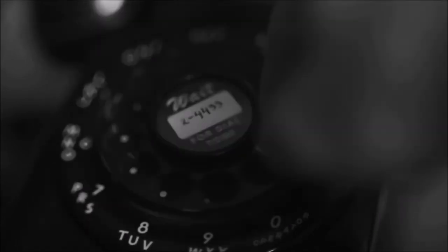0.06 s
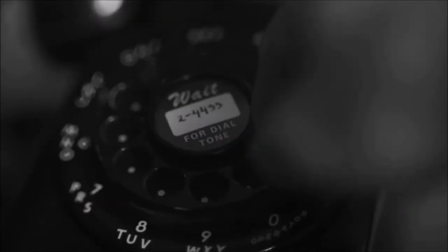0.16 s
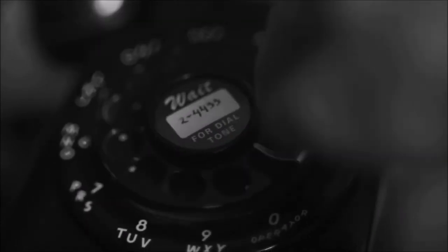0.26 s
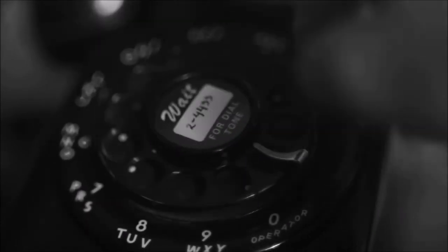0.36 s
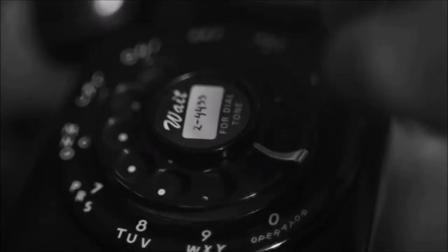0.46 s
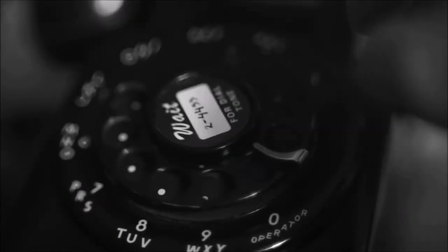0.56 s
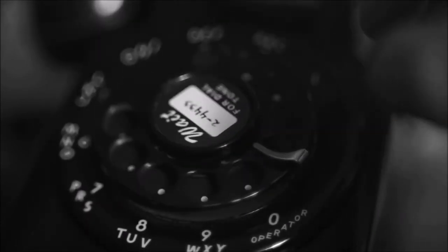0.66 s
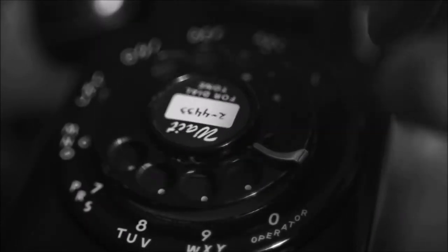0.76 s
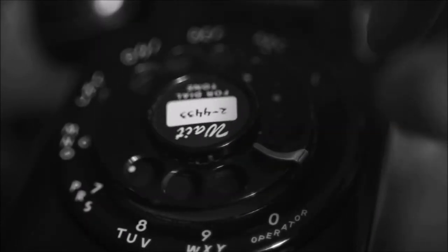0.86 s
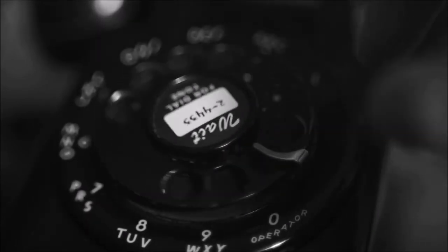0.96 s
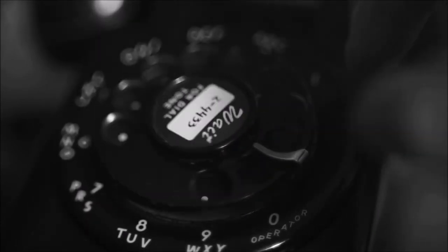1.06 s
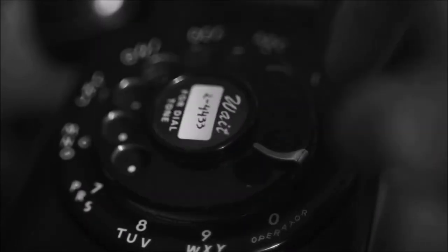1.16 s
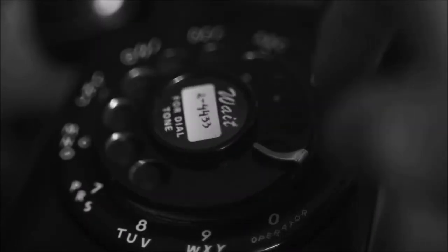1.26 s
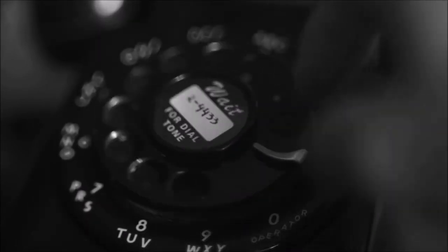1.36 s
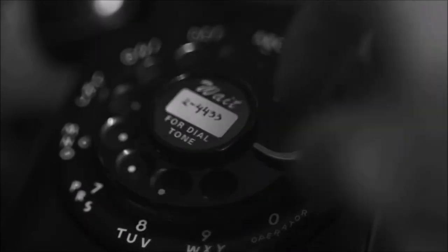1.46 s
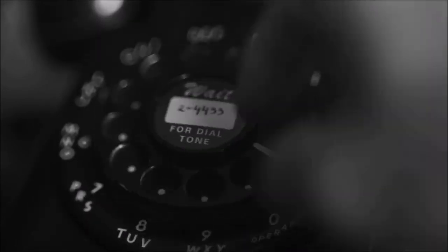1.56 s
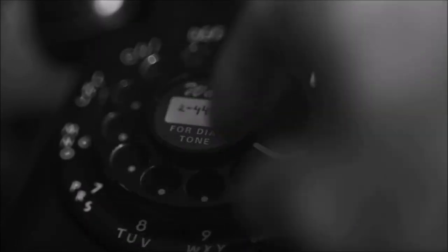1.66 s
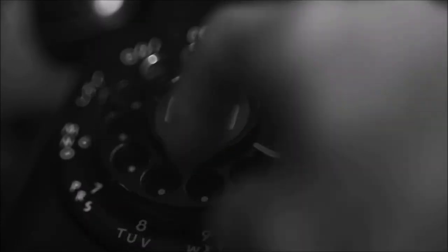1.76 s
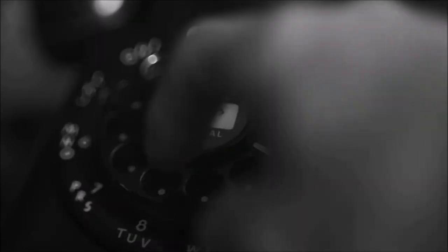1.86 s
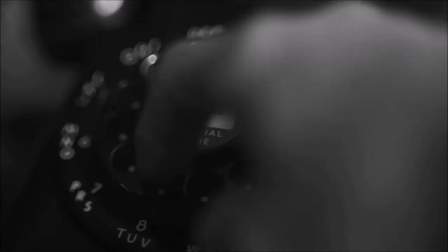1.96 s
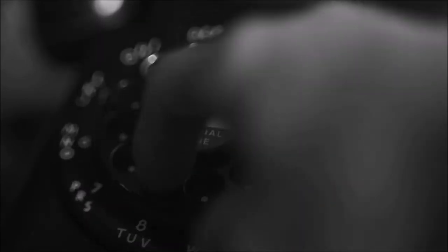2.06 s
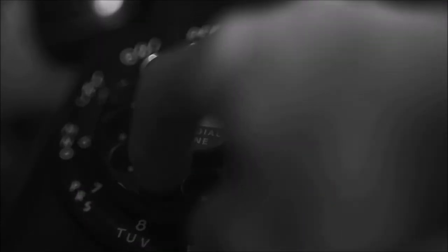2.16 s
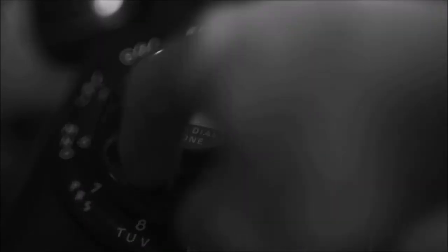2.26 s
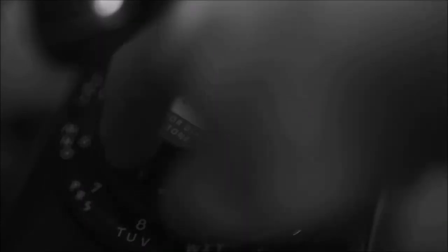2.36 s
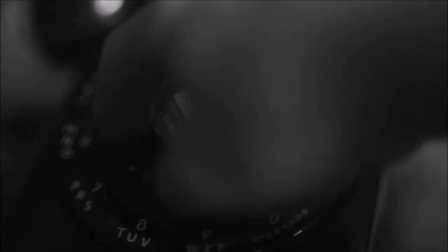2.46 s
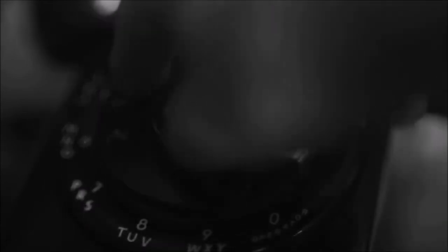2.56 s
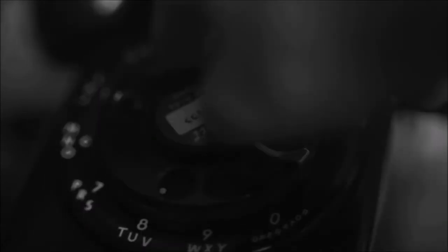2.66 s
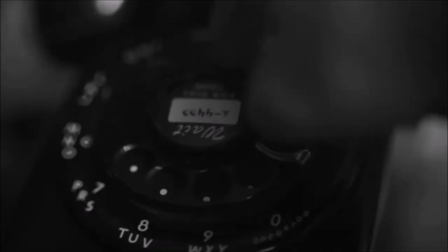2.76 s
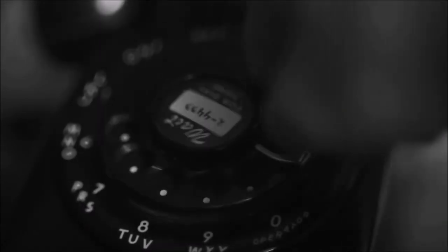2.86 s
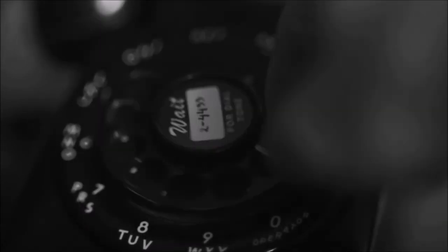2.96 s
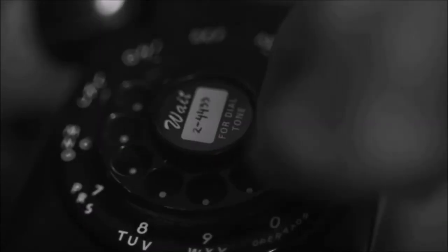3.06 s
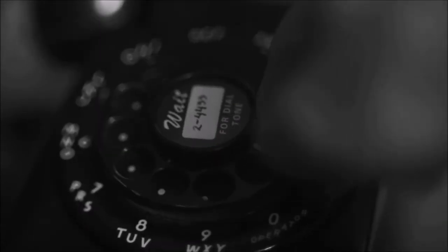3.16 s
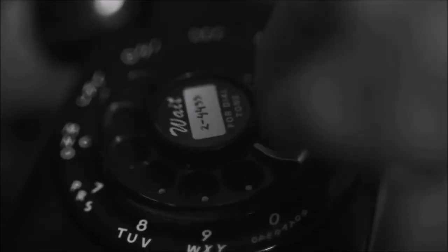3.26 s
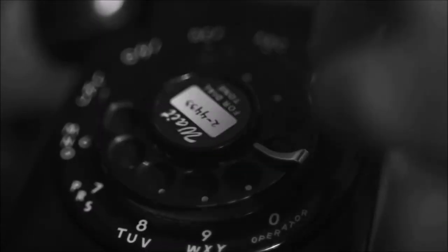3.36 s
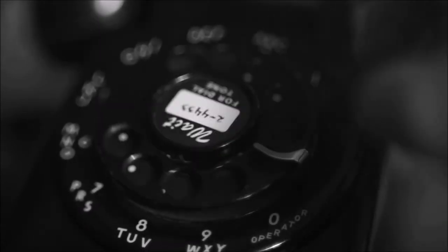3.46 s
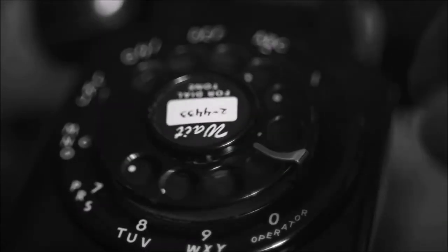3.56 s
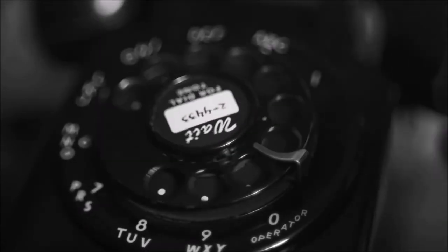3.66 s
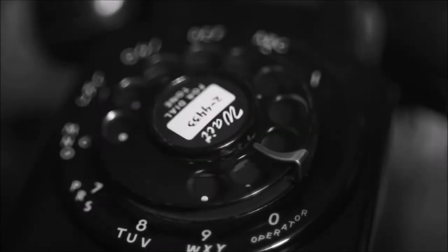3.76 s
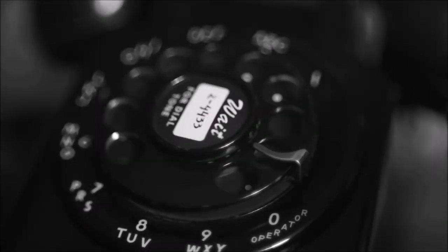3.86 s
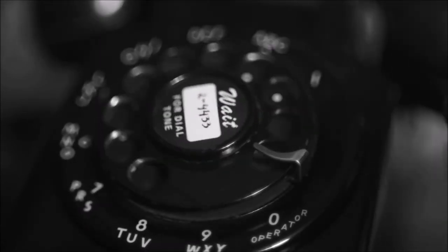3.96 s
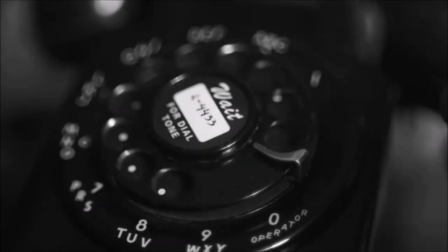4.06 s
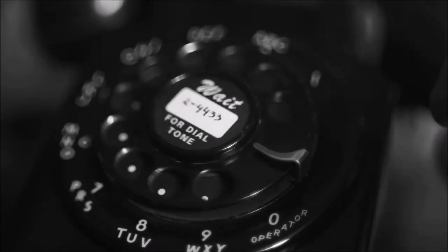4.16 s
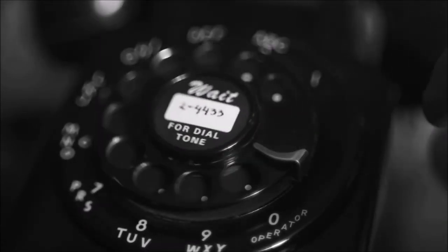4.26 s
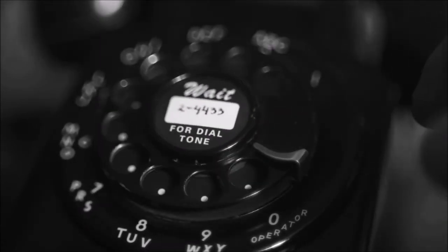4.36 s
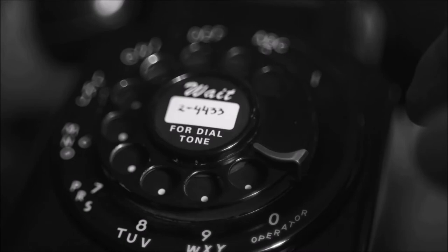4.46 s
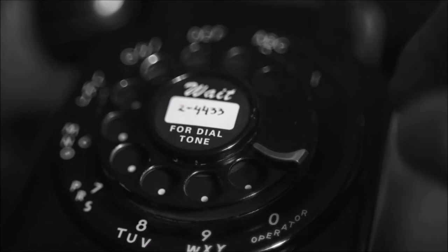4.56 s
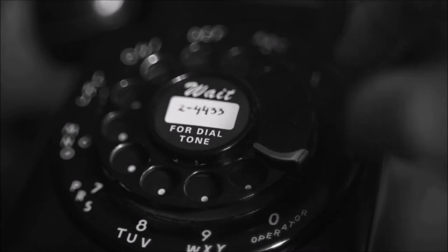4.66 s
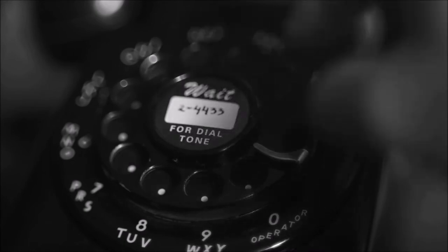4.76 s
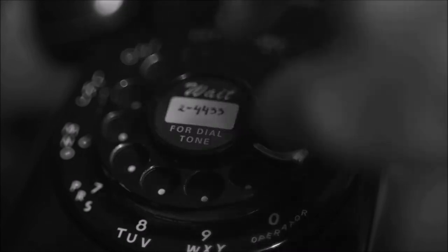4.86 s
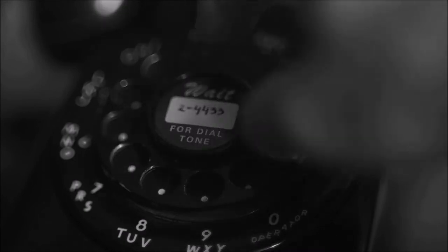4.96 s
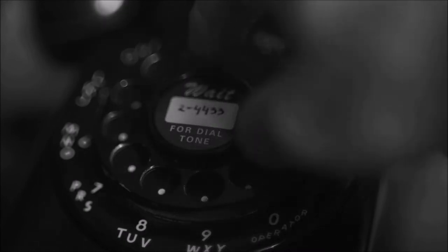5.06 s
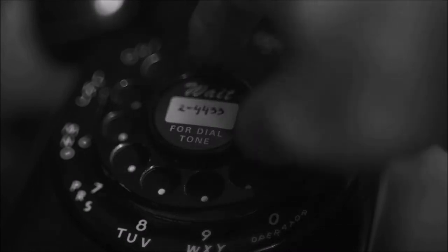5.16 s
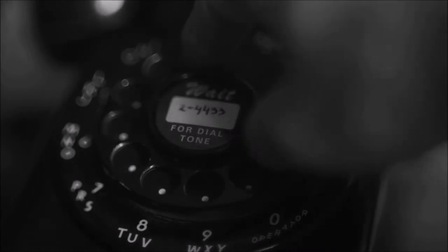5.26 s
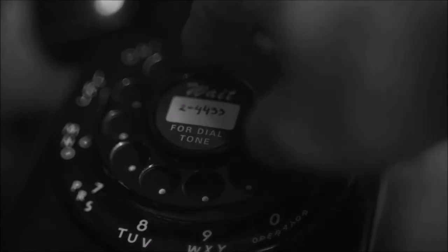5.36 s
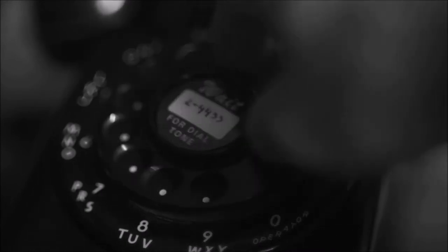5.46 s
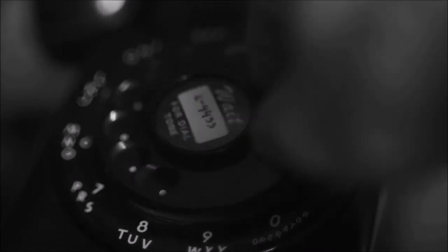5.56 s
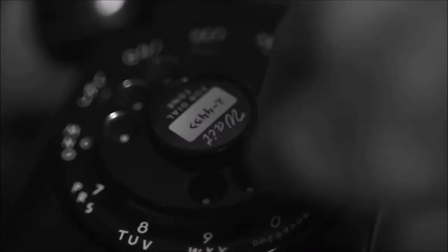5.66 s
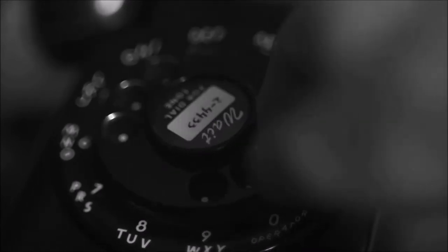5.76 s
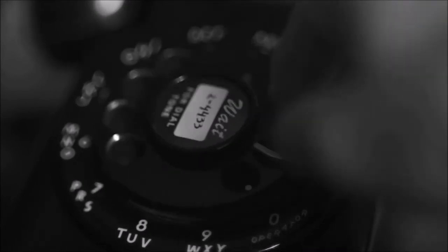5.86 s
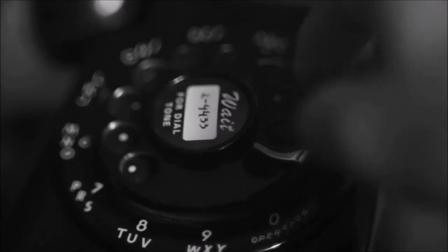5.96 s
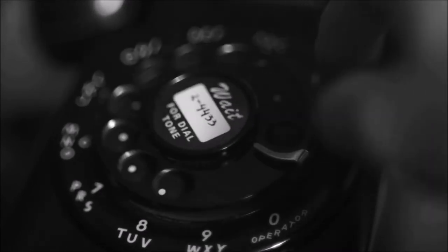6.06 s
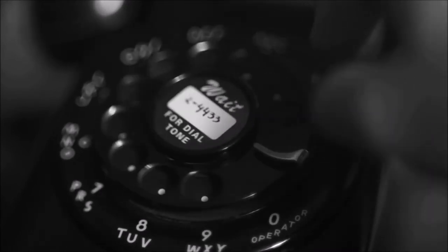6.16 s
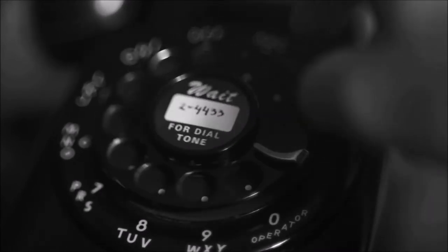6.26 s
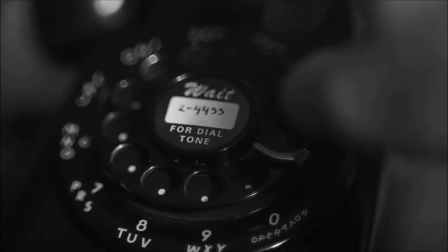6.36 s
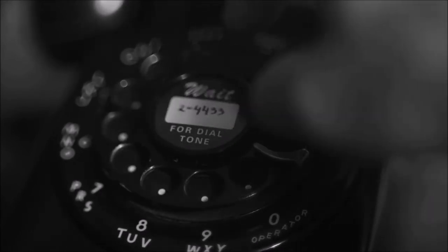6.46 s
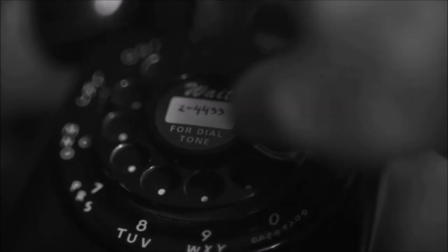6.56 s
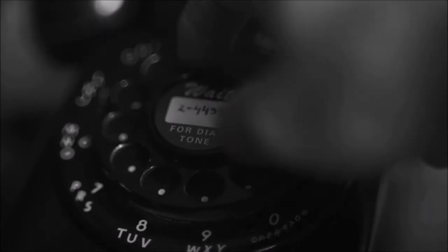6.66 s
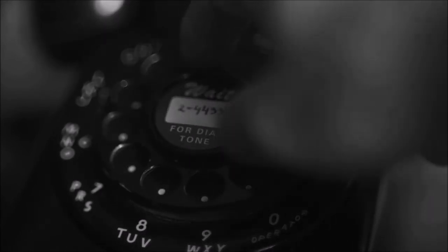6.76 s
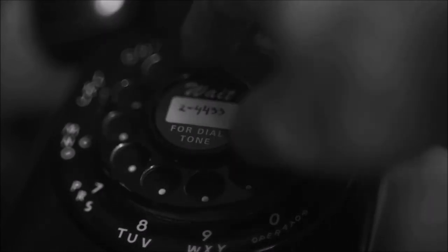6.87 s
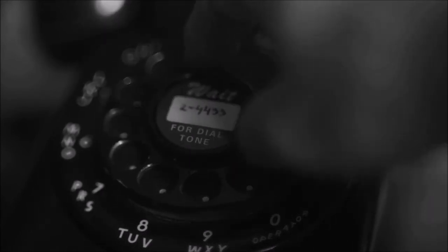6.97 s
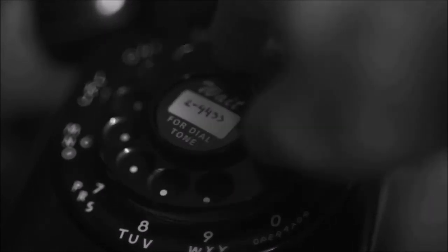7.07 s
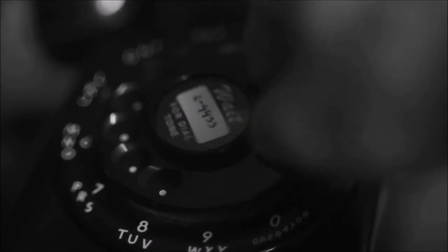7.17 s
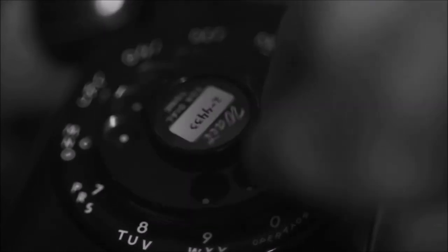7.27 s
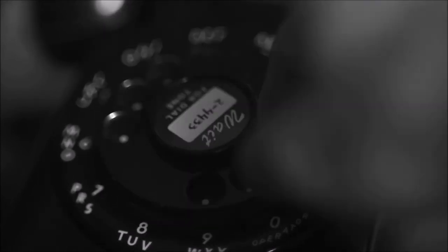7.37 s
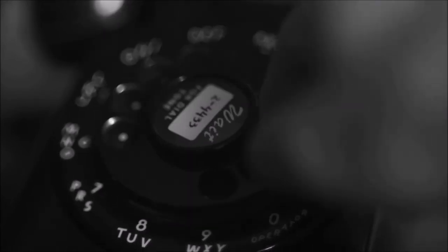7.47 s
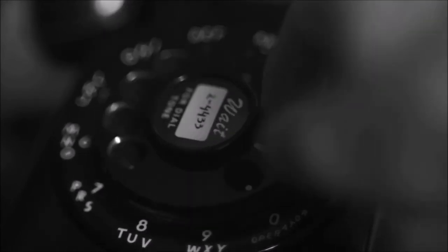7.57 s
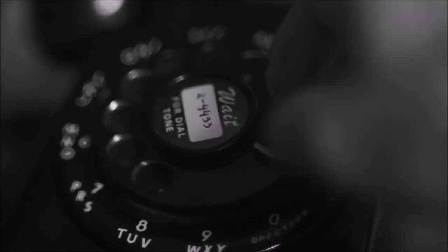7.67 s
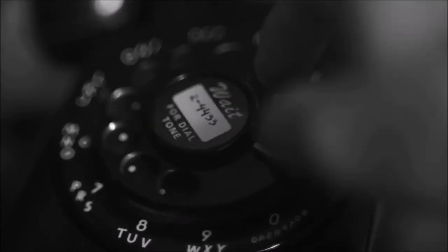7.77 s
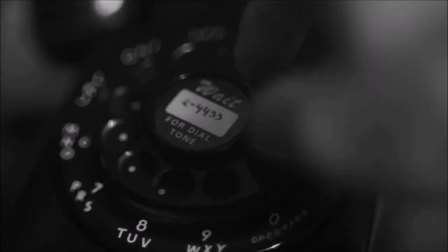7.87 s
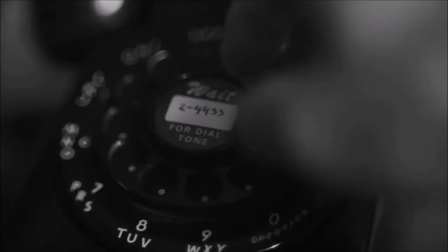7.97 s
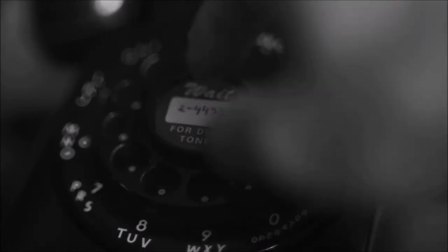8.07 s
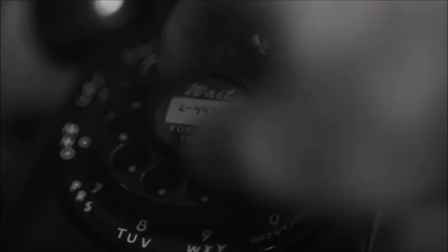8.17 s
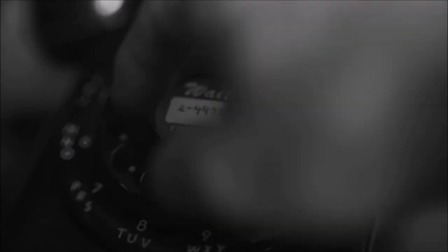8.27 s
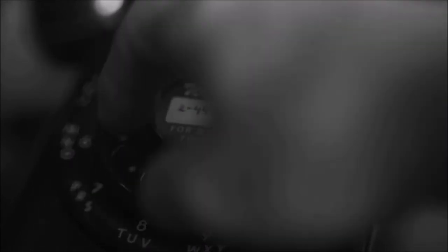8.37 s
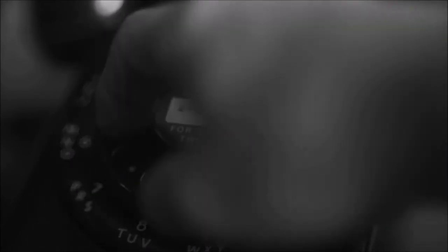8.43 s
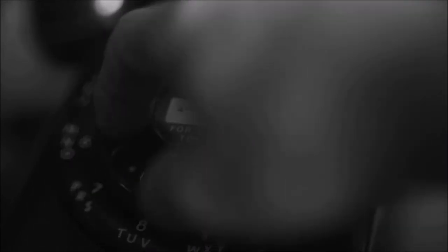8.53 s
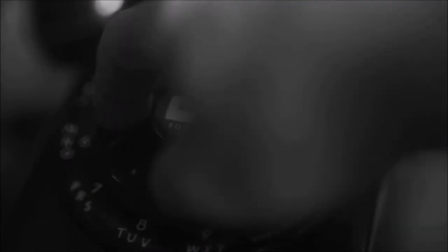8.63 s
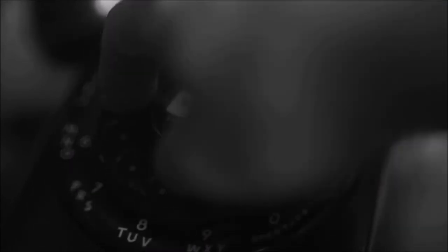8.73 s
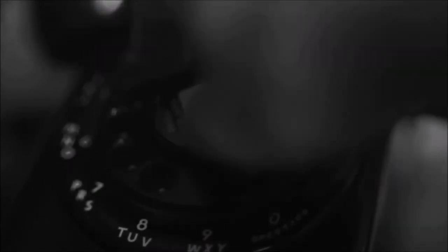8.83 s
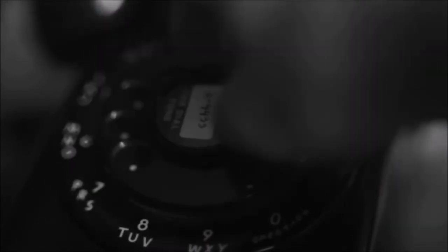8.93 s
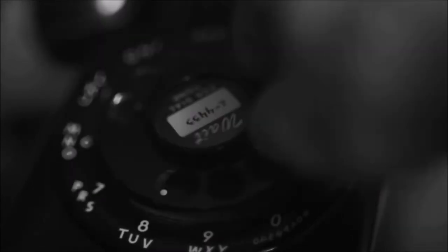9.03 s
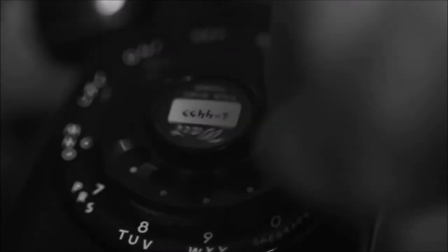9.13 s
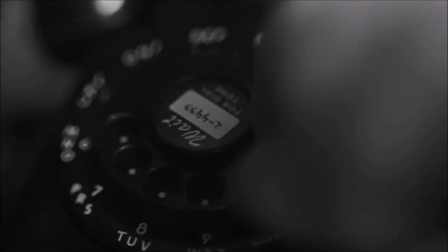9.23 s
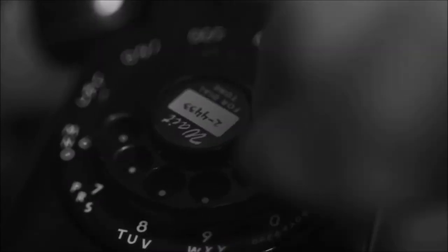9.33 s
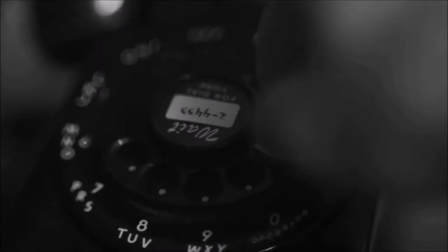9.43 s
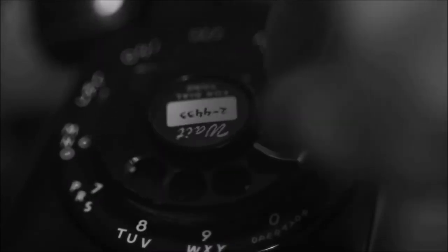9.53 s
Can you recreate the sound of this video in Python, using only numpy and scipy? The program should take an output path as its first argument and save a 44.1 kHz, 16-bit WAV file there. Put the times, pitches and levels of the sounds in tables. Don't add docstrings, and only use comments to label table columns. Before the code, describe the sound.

A close, mono-like view of an old rotary telephone dial in a small quiet room with faint mains hum. It begins at the end of a wind: a few ticks and a metal knock at 0.1 s, finger release, then a long gear whirr with ten even clicks, about eight per second, from 0.4 to 1.5 s, landing with a clack and short bright ring at 1.6 s. Light finger touches follow. A slow, ratcheting wind runs from 2.2 to a hard stop at 3.0 s; the wheel returns with eight clicks and lands loudly, ringing, at 4.3 s. After a pause with soft table thumps, quick winds hit the stop at 5.7 and 7.3 s, each followed by a short four-click return landing at 6.3 and 8.0 s. A last jerky wind from 8.6 s knocks at 9.2 s, and its whirring return is cut off after two clicks.

```python
import sys
import numpy as np
from scipy import signal
from scipy.fft import rfft, irfft, next_fast_len
from scipy.io import wavfile
from scipy.ndimage import uniform_filter1d, minimum_filter1d, map_coordinates

SR = 44100
rng = np.random.default_rng(int(sys.argv[2]) if len(sys.argv) > 2 else 0)


def boost_factor(decibels):
    exponent = np.asarray(decibels, float) / 20
    return 10 ** exponent


def to_wav(s):
    ch = np.atleast_2d(s).T
    pcm = np.round(np.clip(ch, -1, 1) * 32767)
    wavfile.write(sys.argv[1], SR, pcm.astype(np.int16))


N = 423360

# (time [s], finger effort [dB])
WINDING_TURNS = [
    [(0.0, -35), (0.026, -34.5), (0.048, -30.5), (0.104, -43)],
    [(2.2, -67), (2.26, -53), (2.35, -48), (2.454, -42), (2.584, -40.5), (2.676, -40), (2.844, -44),
     (2.924, -41), (3.038, -36.5)],
    [(5.38, -79), (5.43, -48), (5.478, -40), (5.496, -40), (5.53, -41.5), (5.63, -36.5), (5.642, -28.5),
     (5.696, -31)],
    [(7.0, -50.5), (7.085, -46), (7.126, -48), (7.142, -36), (7.33, -37)],
    [(8.62, -54.5), (8.752, -46.5), (8.782, -45.5), (8.864, -37), (9.02, -43), (9.142, -33), (9.15, -25.5),
     (9.185, -31.5), (9.222, -51)],
]
# (let go [s], full speed [s], level [dB])
RETURN_RUNS = [
    (0.185, 0.37, 3.5),
    (3.167, 3.243, 2),
    (5.797, 5.87, 2.5),
    (7.46, 7.546, 2),
    (9.328, 9.433, 4.5),
]
# (time [s], peak [dB], sparkle [dB])
CAM_FLICKS = [(0.4118, -27.5, -1), (0.5312, -27, 0), (0.651, -30, 0.5), (0.772, -29, -1.5),
              (0.897, -29, 0.5), (1.0201, -25, -3.5), (1.1455, -28.5, 0), (1.273, -32, 3),
              (1.401, -29, -0.5), (1.533, -30.5, 1.5), (3.382, -29.5, -0.5), (3.501, -28.5, -2),
              (3.624, -29, -1), (3.7471, -28, -3), (3.8732, -28, -2), (4.0002, -29.5, 1), (4.128, -28.5, 1),
              (4.26, -27.5, -3), (5.898, -33, -5.5), (6.0352, -26.5, -6), (6.163, -25.5, -6),
              (6.2956, -26, -7), (7.565, -34, -3), (7.704, -26, -8), (7.834, -24.5, -6.5),
              (7.9651, -25.5, -7), (9.438, -29.5, -9.5), (9.5716, -25, -8.5)]
# (delay [s], level under the flick [dB])
SMALL_TEETH = [
    (0.054, -14.5),
    (.08, -16.5),
    (.103, -14),
]
# (time [s], peak [dB], case knock [dB], sparkle [dB], rebound [dB])
STOP_HITS = [
    (0.108, -18.5, -12.5, -19, -27.5),
    (3.041, -15, -18, -24, -22.5),
    (5.6988, -16, -19, -29, -25),
    (7.3333, -17.5, -11.5, -28, -24.5),
    (9.226, -17.5, -19, -39, -23.5),
]
REBOUND_DELAYS = [.015, .0155, .0135, .0128, .0163]
REBOUND_PARTS = -11, -12.5
# (time [s], peak [dB], case knock [dB], sparkle [dB], ring length [times])
LANDINGS = [
    (1.5866, -17, -9.5, -19, 1.3),
    (4.315, -12, -12, -22, 1.4),
    (6.349, -12.5, -12, -27, 1),
    (8.0193, -13.5, -11, -23, 1.18),
]
# (time [s], delay [s], drop [dB], seat [dB], sparkle [dB])
PAWL_DROPS = [
    (2.624, 0.0096, -26.5, -29, -7),
    (2.8709, 0.0092, -24.5, -27, -8),
    (2.9482, 0.013, -24.5, -27, -6.5),
    (7.188, 0.012, -28, -26, -8),
    (7.252, .0125, -27, -22, -14),
    (9.026, .011, -24.5, -23.5, -11),
    (9.117, 0.0099, -23, -27, -10),
]
# (time [s], peak [dB], sparkle [dB])
PAWL_TICKS = [(0.0231, -33, -1), (0.0558, -30.5, 2), (2.4345, -44, -9), (2.538, -39, -12), (2.562, -38, -3),
              (3.01, -48, -14), (5.5665, -35, -10), (5.5922, -27, -20), (7.151, -28.5, -17),
              (7.2286, -42, -20), (9.107, -33, -14), (9.155, -23, -15), (9.1645, -29, -17), (0.086, -28, 1),
              (2.467, -30, -3), (2.4986, -34, -4), (2.549, -28, -5), (2.577, -31, -11), (2.6468, -26, -8),
              (2.6909, -28, -6), (2.726, -30.5, -6), (2.782, -23, -9), (2.817, -30.5, -4),
              (3.0202, -27.5, -6), (2.4836, -46, -10), (2.603, -33, -13), (2.8017, -37, -1),
              (2.8925, -31, -3), (2.9375, -37, 7), (5.462, -46, -17), (5.487, -33, -22), (5.553, -40, -8),
              (5.6338, -36, -14), (5.6433, -33, -13), (5.691, -39, -10), (7.2977, -48, -12),
              (7.2103, -36, -14), (7.2566, -21, -10), (7.4573, -45, -25), (8.9484, -31, -20),
              (8.865, -30, -13), (8.7886, -50, -12), (8.8758, -33, -10), (9.13, -39, -16), (9.15, -17, -12),
              (9.217, -37, -18), (5.5785, -27, -9), (5.6042, -31, -20), (7.1416, -31, -22),
              (7.2737, -27, -18), (7.3147, -21, -15), (7.3218, -26, -7), (8.8308, -36, -13),
              (8.8544, -28, -6), (8.9333, -25.5, -5.5), (8.968, -25, -31), (9.092, -25.5, -9),
              (9.174, -35, -19), (9.195, -19, -17)]
# (time [s], peak [dB], case knock [dB], sparkle [dB])
FINGER_TAPS = [(0.1668, -40, -6, -31), (0.2501, -27, -7, -15), (0.2621, -40.5, 5.5, -10),
               (0.294, -33, -10.5, -8), (1.6722, -45.5, -6, -12), (8.435, -58, -30, -30),
               (8.45, -50, -30, -30), (8.475, -54, -30, -30), (2.013, -46, -25, -30),
               (2.034, -49, -23, -18), (3.143, -41, -7.5, -22), (3.2085, -48, -20, -30),
               (9.048, -32, -9, -16), (9.064, -35, -12, -6), (8.8136, -47, -3, -16), (2.12, -59, 0.5, -30),
               (2.19, -59, 0.5, -30), (2.339, -36, -4.5, -9), (3.133, -33, -22, -33),
               (3.2187, -31, -3, -23), (3.251, -27.5, -15, -5.5), (3.3426, -42, -27, -21),
               (4.3885, -42.5, -8, -32), (6.4368, -48, 1.5, -27), (5.846, -47, -9, -25),
               (5.865, -37.5, -1.5, -25), (7.4938, -58, -15, -25), (7.542, -33, -9, -19),
               (7.613, -42, 0, -25), (7.6669, -60, -12, -25), (7.0924, -30.5, -4, -13),
               (7.444, -31.5, -10.5, -34), (7.523, -42, 5, -26), (8.7429, -34.5, -0.5, -11),
               (9.3363, -21.5, -26, -38), (9.398, -25, -5.5, -25)]
# (time [s], level [dB])
NAIL_PLUCKS = [
    (2.035, -68),
    (5.815, -54),
    (8.465, -71),
    (9.3362, -45),
]
TICK_TAIL = -12, .075
# (level at a middling effort [dB], growth with effort [dB per dB])
WINDING_LAYERS = [(-43, 1.044), (-46.5, 1.55), (-57.5, 1.7)]
# (level at full speed [dB], growth with speed [dB per dB])
RETURN_LAYERS = [(-45.5, 0.69), (-53, 0.51), (-91, .5)]
# (frequency [Hz], width [Hz], level [dB])
CASE = [(358, 198, -12), (429.3, 27.6, 2), (468, 45, -4.5), (539, 40, 0.5), (637, 30, -5.5),
        (787.5, 49, -9.5), (917, 51, -5), (975, 270, -10), (1097, 42, -3.5), (1161, 51, -6), (1278, 84, -7),
        (1431, 47, -7.5), (1496, 37, -4.5), (1583, 60, -8.5), (1670, 91, -5.5), (1845, 124, -5.5),
        (2206, 220, -15), (2367, 157, -14), (2687, 610, -15), (2957, 710, -15.5)]
# (frequency [Hz], width [Hz], level [dB])
CASE_KNOCK = [(480, 127, 0), (1090, 233, -3.5), (1746, 274, 4), (3213, 320, -7.5)]
# (frequency [Hz], width [Hz], level [dB])
WHEEL = [(2910, 104, 1.5), (3950, 210, -4), (4800, 180, 1.5), (5960, 320, 2), (7410, 270, 13),
         (9400, 170, -1), (10600, 230, -14.5)]
# (frequency [Hz], width [Hz], level [dB])
GOVERNOR = [(3660, 310, -4), (4700, 520, 6), (5710, 480, 9), (6660, 350, 11.5), (7520, 550, 10.5),
            (8540, 460, -2), (9540, 230, 4), (10460, 390, -11)]
# (frequency [Hz], width [Hz], level [dB])
THIN_PARTS = [(9870, 550, -4), (10950, 120, 2.5), (11600, 1100, -6.5), (12800, 250, 1), (13500, 320, 3.5),
              (15050, 700, -20)]
# (frequency [Hz], width [Hz], level [dB])
CONTACT_SPRINGS = [(3110, 205, -11), (4070, 270, -7.5), (4980, 260, -4), (6630, 450, 0), (7600, 240, 4.5),
                   (8900, 510, -4.5)]
# (frequency [Hz], width [Hz], level [dB])
FINGER_STOP = [(3200, 100, -17), (5760, 1400, -14), (7570, 124, 10.5), (9280, 48, -37), (8780, 310, -3),
               (9640, 70, -10.5), (6820, 230, -22)]
# (frequency [Hz], width [Hz], level [dB])
HOME_PIN = [(2950, 120, -19.5), (3020, 180, -24), (4440, 100, -25), (6050, 230, -12.5), (7170, 290, -9.5),
            (7900, 190, -2.5), (8030, 126, -8), (8550, 120, -16), (9440, 100, -23)]
RING_HZ = [530, 5609, 5749, 8452, 8586]
# (level [dB], time to fall 60 dB [s])
RING_DECAY = [(-34, .09), (-53, .45), (-60, .36), (-46.5, .45), (-50, .3)]
# (frequency [Hz], level [dB], time to fall 60 dB [s])
LANDING_BUZZ = [(5940, -52, .14), (6100, -44, .12), (6360, -54, .16), (6900, -56, .1), (7540, -42, .15),
                (7632, -37, .16), (7720, -39, .14), (9150, -52, .14), (9550, -47, .14)]
# (time [s], level near 5 kHz [dB])
HAND_SHADE = [(0, 8.5), (.3, 3.5), (1, 0), (2.7, 1.5), (3.8, 1), (5.6, -2.5), (6.1, -6.5), (7.2, -3),
              (7.8, -5.5), (9, -3), (9.5, -8.5)]
# (time [s], peak [dB], frequency [Hz], swell [s])
KNUCKLES = [
    (1.279, -26.5, 75, 0.0046),
    (2.633, -36, 76.6, 0.0065),
    (5.275, -38.5, 70.6, 0.014),
    (5.4155, -40, 60, .014),
    (5.448, -47, 62, 0.011),
    (5.674, -42, 75, 0.0081),
    (5.791, -37, 92, 0.0076),
    (6.0, -47, 55, 0.017),
    (8.797, -33, 114, 0.0073),
    (8.921, -45, 70, 0.0066),
]
# (time [s], level [dB], hold [s])
TABLE_BUMPS = [(1.2, -55, 0.028), (1.33, -53, .04), (1.564, -46.5, 0.028), (1.747, -53, 0.27),
               (1.42, -55, 0.11), (2.204, -60, 0.089), (2.35, -55, .12), (2.638, -53, 0.0076),
               (3.645, -61, 0.067), (5.283, -45.5, 0.015), (5.41, -48, 0.044), (5.53, -51.5, 0.31),
               (6.007, -56, 0.16), (7.617, -59, .04), (7.806, -60, 0.013), (8.804, -48.5, 0.14),
               (9.232, -49.5, 0.025), (9.443, -61, .15)]
# (frequency [Hz], level [dB per Hz])
TABLE_COLOUR = [(15, -2.5), (30, -15.5), (60, -5.5), (95, -13), (150, -13), (240, -30), (330, -14),
                (420, -59)]
# (frequency [Hz], time to fall 60 dB [s])
WALL_DECAY = [(300, 0.18), (2000, 0.14), (8000, 0.11), (15000, 0.19)]
# (frequency [Hz], level [dB per Hz])
AIR_COLOUR = [(120, -6), (205, -6.5), (396, -5), (426, -2.5), (712, -10.5), (937, -11.5), (1170, -8.5),
              (1430, -15), (2380, -19.5), (2920, -20.5), (11900, -30), (16300, -36.5)]
# (frequency [Hz], level [dB rms])
HUM_TONES = [(60, -89), (120, -56), (180, -65.5), (1141, -69), (12000, -100)]
# (time [s], edge above which only strong tones survive [Hz])
THINNED = [(.48, 3000), (.59, 2600), (.885, 2500), (1.46, 3000), (1.95, 3000), (2.1, 3000), (2.38, 3000),
           (2.929, 8000), (2.942, 8000), (5.518, 3600), (3.725, 2500), (3.853, 2200), (4.06, 3500),
           (4.445, 2500), (4.585, 1600), (4.81, 3000), (4.915, 2800), (4.955, 4000), (5.11, 3000),
           (5.21, 3000), (5.512, 2500), (6.515, 2600), (6.59, 1500), (7.074, 2800), (7.82, 2500),
           (8.263, 2800), (8.33, 3000), (8.455, 2800), (8.5, 2600), (8.615, 1500), (8.97, 3500),
           (9.35, 2500), (9.48, 9500)]

FIRM_DB = -40
GRIP_DB = -32.5
START_DB, TIRING_DB, TIRING_S = -21, -6.5, 0.079
LAST_HOME_S = 10
PAWL_KNOCK_DB, KNOCK_GROWS = -14, 0.32
DROP_KNOCK_DB, SEAT_KNOCK_DB, SEAT_DULLER_DB = -13, -14.5, -1
TOOTH_SCATTER_S, TOOTH_SCATTER_DB = .005, 3.5
CHATTER_DB, CHATTER_S = 3.5, .002
COLOUR_DB = 2.4
CRACK_DB = -8
UPPER_DB, UPPER_FOLLOWS = -7, -0.72
TOP_DB, TOP_FOLLOWS = -4.5, -0.71
TABLE_DB, LEAN_DB_PER_S, EASE_DB_PER_S = -76, 126, 152
SHIFT_S = .4
ROOM_DB = -56
LEFTOVER_DB, MILD_HZ = -15, 2550


def gears():
    out = turning([np.subtract(turn, (0, FIRM_DB)) for turn in WINDING_TURNS], WINDING_LAYERS)
    back = turning(return_drives(), RETURN_LAYERS)
    rumble, rattle, fizz = out + back
    meshing = boost_factor(2 * wobble(55)) * grit(300, 3, smooth=1.8)
    case = body(rumble * meshing, CASE)
    deep = filtered(case, lambda f: 1 / (1 + (f / 720) ** 8))
    case = case - deep * out[0] / (out[0] + boost_factor(GRIP_DB))
    shake = boost_factor(2.2 * wobble(60)) * grit(400, 3.4, smooth=.55)
    scrape = boost_factor(2 * wobble(40)) * grit(300, 3.2, smooth=.55)
    wheel = patchy(body(out[1] * scrape, WHEEL, widen=4.5, order=2), 4.4)
    governor = patchy(body(back[1] * shake, GOVERNOR, widen=1.03, order=2), 2.5)
    thin = body(fizz * shake, THIN_PARTS, widen=1.8)
    return boost_factor(-0.5) * patchy(case, 1.47) + boost_factor(-2.5) * (wheel + governor) + boost_factor(-4.5) * thin


def return_drives():
    home_times = [row[0] for row in LANDINGS] + [LAST_HOME_S]
    return [[(go, db + START_DB), (full, db), (home - TIRING_S, db), (home, db + TIRING_DB)]
            for (go, full, db), home in zip(RETURN_RUNS, home_times)]


def turning(turns, layers):
    t = np.arange(0, N / SR + .01, .001)
    gain = 0
    for turn in turns:
        drive = np.interp(t, *np.transpose(turn), left=-300, right=-300)
        gain = gain + np.array([boost_factor(db + grows * drive) for db, grows in layers])
    gain = uniform_filter1d(gain, size=9, axis=1)
    return np.array([np.interp(np.arange(N) / SR, t, g) for g in gain])


def contact_flicks():
    events = [(s, db, -14, sparkle) for s, db, sparkle in CAM_FLICKS]
    shape = burst_shape(.9, -14.0, 0.21, [(.0018, -11), (.026, -19), (.037, -24)])
    return clicks(events, CONTACT_SPRINGS, 1.85, shape, level_db=-6.5, knock_db=5.8, sparkle_db=0.43,
                  low_hz=2300, thin_t60=0.44)


def stop_hits():
    shape = burst_shape(.4, -22, 0.026, [(.0008, -0.5), (.0022, 13)])
    return clicks(STOP_HITS, FINGER_STOP, 4.5, shape, level_db=-3.0, knock_db=0.94, sparkle_db=.6,
                  low_hz=4930, thin_t60=.6)


def home_hits():
    shape = burst_shape(.4, -22.5, 0.21, [(.0012, 3.5), (.0025, 6.5)])
    return clicks(LANDINGS, HOME_PIN, 2.63, shape, level_db=-4.5, knock_db=0.44, sparkle_db=2.7,
                  low_hz=3070, thin_t60=.6)


def landing_ring():
    out, t = np.zeros(N + SR), np.arange(SR // 2) / SR
    lasting = [(hz, *decay) for hz, decay in zip(RING_HZ, RING_DECAY)]
    for s, *_, lasts in LANDINGS:
        for tones, waver in (lasting, .003), (LANDING_BUZZ, .07):
            for hz, level, t60 in tones:
                drift = np.cumsum(rng.standard_normal(len(t))) * waver * hz / 7000
                fading = boost_factor(level + rng.normal(0, 1) - 60 * t / t60 / lasts)
                add_at(out, s, fading * np.sin(2 * np.pi * hz * t + drift))
    hz, _, t60 = lasting[3]
    for s, db in NAIL_PLUCKS:
        swell = 1 - np.exp(-t / 0.015)
        add_at(out, s, boost_factor(db - 60 * t / t60) * swell * np.sin(2 * np.pi * hz * t))
    return out[:N]


def small_contacts():
    shape = burst_shape(.85, *TICK_TAIL, [(.0015, -4)])
    return clicks(small_contact_events(), WHEEL, 3.8, shape, level_db=-9.0, knock_db=6.4, sparkle_db=0.6,
                  low_hz=2800, thin_t60=0.44)


def small_contact_events():
    pawl = [(s, db, PAWL_KNOCK_DB + (KNOCK_GROWS - 1) * (db + 32.0), top) for s, db, top in PAWL_TICKS]
    drops = [(s, db, DROP_KNOCK_DB, top) for s, _, db, _, top in PAWL_DROPS]
    seats = [(s + late, db, SEAT_KNOCK_DB, top + SEAT_DULLER_DB) for s, late, _, db, top in PAWL_DROPS]
    rebounds = [(s + late, db, *REBOUND_PARTS) for (s, *_, db), late in zip(STOP_HITS, REBOUND_DELAYS)]
    rests = [row[0] for row in LANDINGS] + [N / SR]
    teeth = []
    for s, db, _ in CAM_FLICKS:
        for late, under in SMALL_TEETH:
            if any(s < rest < s + late + .02 for rest in rests):
                continue
            time = s + late + TOOTH_SCATTER_S * rng.normal()
            teeth.append((time, db + under + TOOTH_SCATTER_DB * rng.normal(), -14, -23))
    return pawl + drops + seats + rebounds + FINGER_TAPS + teeth


def clicks(events, metal, widen, shape, level_db, knock_db, sparkle_db, low_hz, thin_t60):
    out, tap = np.zeros(N + SR), np.arange(SR // 20) == 0
    parts = [(metal, widen, 2, [low_hz, 10500]),
             (CASE_KNOCK, 1.2, 1, [200, 3600]),
             (THIN_PARTS, 1.3, 1, [9800, 18000])]
    rings = []
    for peaks, wider, order, band in parts:
        ring = body(tap, peaks, wider, order) + boost_factor(CRACK_DB) * tap
        rings.append(signal.sosfilt(signal.butter(3, band, "bandpass", fs=SR, output="sos"), ring))
    rings = np.array(rings)
    t = np.arange(len(shape)) / SR
    shapes = shape * boost_factor(-60 * np.outer([0, 0, 1], t) / thin_t60)
    for s, db, knock, sparkle, *_ in events:
        lump_levels = rng.standard_normal(70) * (np.arange(70) > 1)
        lumps = np.interp(t / CHATTER_S, np.arange(70), lump_levels)
        burst = shapes * boost_factor(CHATTER_DB * lumps) * rng.standard_normal((3, len(shape)))
        sound = signal.fftconvolve(burst, rings, axes=1)
        length = sound.shape[1]
        hz = np.fft.rfftfreq(length, 1 / SR)
        colour = np.interp(hz, np.arange(0, SR, 900), rng.standard_normal(49))
        sound = irfft(rfft(sound) * boost_factor(COLOUR_DB * colour), length)
        sound /= np.sqrt(np.mean(sound[:, :SR // 200] ** 2, axis=1))[:, None]
        levels = level_db + db + np.array([0, knock + knock_db, sparkle + sparkle_db])
        add_at(out, s, boost_factor(levels) @ sound)
    return out[:N]


def burst_shape(crack_ms, tail_db, tail_t60, bounces):
    t = np.arange(SR // 6) / SR

    def crack(u):
        return np.e * np.clip(u, 0, 1) * 1000 / crack_ms * np.exp(-abs(u) * 1000 / crack_ms)

    rebounds = sum(boost_factor(db) * crack(t - s) for s, db in bounces)
    return crack(t) + boost_factor(tail_db - 60 * t / tail_t60) + rebounds


def shaded(x):
    db = np.interp(np.arange(N) / SR, *np.transpose(HAND_SHADE))

    def group(hz, spread):
        return filtered(x, lambda f: np.exp(-(np.log(f / hz + 1e-9) / spread) ** 4))

    narrow = (boost_factor(-0.5) - 1) * group(5520, 0.02)
    middle = (boost_factor(db) - 1) * group(5200, 0.26)
    upper = (boost_factor(UPPER_DB + UPPER_FOLLOWS * db) - 1) * group(7320, 0.12)
    top = (boost_factor(TOP_DB + TOP_FOLLOWS * db) - 1) * group(13400, 0.056)
    return x + narrow + middle + upper + top


def knuckle_thumps():
    out, t = np.zeros(N + SR), np.arange(SR // 4) / SR
    for s, db, hz, swell in KNUCKLES:
        push = (t / swell) ** 2 * np.exp(2 - 2 * t / swell)
        add_at(out, s, -boost_factor(db) * push * np.sin(2 * np.pi * hz * t))
    return out[:N]


def walls(x):
    out, step = np.zeros(N + SR), round(SHIFT_S * SR)
    for start in range(-step, N, step):
        hz, t, z = signal.stft(rng.standard_normal(SR // 3), SR, nperseg=256)
        decay = boost_factor(-60 * t / along(WALL_DECAY, hz)[:, None])
        tail = signal.istft(z * decay, SR, nperseg=256)[1]
        fade = np.sin(np.pi * np.arange(2 * step) / (2 * step))[max(-start, 0):]
        piece = x[max(start, 0):start + 2 * step]
        wet = signal.fftconvolve(piece * fade[:len(piece)], tail / np.linalg.norm(tail))
        out[max(start, 0) + 200:][:len(wet)] += wet
    return out[:N]


def room_tone():
    t = np.arange(N) / SR
    air = boost_factor(ROOM_DB + 0.39 * wobble(26)) * tinted(rng.standard_normal(N), AIR_COLOUR)
    hum = np.zeros(N)
    for hz, db in HUM_TONES:
        hum += boost_factor(db + 1.2 + 1.5 * wobble(25)) * np.sin(2 * np.pi * hz * t + 0.35 * wobble(22))
    table = boost_factor(table_db(t) + 1.5 * wobble(8.4)) * tinted(rng.standard_normal(N), TABLE_COLOUR)
    return air + hum + table


def table_db(t):
    s, db, hold = np.transpose(TABLE_BUMPS)[:, :, None]
    u = t[::256]
    leaning = LEAN_DB_PER_S * np.clip(s - u, 0, 1)
    easing = EASE_DB_PER_S * np.clip(u - s - hold, 0, 1)
    power = boost_factor(TABLE_DB) ** 2 + (boost_factor(db - leaning - easing) ** 2).sum(axis=0)
    return np.interp(t, u, 10 * np.log10(power))


def grit(rate, spread_db, smooth):
    strength = boost_factor(spread_db * np.minimum(rng.exponential(size=N), 3.5))
    hits = (rng.random(N) < rate / SR) * strength
    puff = boost_factor(-60 * np.arange(400) / SR / 0.012)
    return unit((smooth + unit(signal.fftconvolve(hits, puff)[:N])) * rng.standard_normal(N))


def patchy(x, depth_db):
    z = signal.stft(x, nperseg=256)[2]
    field = uniform_filter1d(rng.standard_normal(z.shape), size=4, axis=0)
    field = uniform_filter1d(field, size=25, axis=1)
    return signal.istft(z * boost_factor(depth_db * unit(field)), nperseg=256)[1][:N]


def body(x, peaks, widen=1, order=1):
    def gain(f):
        total = 0
        for k, (center, width, db) in enumerate(peaks):
            damping = 1j * f * width * widen
            total = total + (-1) ** k * boost_factor(db / order) * damping / (center ** 2 - f ** 2 + damping)
        return total ** order

    return filtered(x, gain) / np.sqrt(np.mean(abs(gain(np.linspace(0, SR / 2, num=4000))) ** 2))


def tinted(x, points):
    def gain(f):
        return boost_factor(along(points, f))

    return filtered(x, gain) / np.sqrt(np.mean(gain(np.linspace(0, SR / 2, num=4000)) ** 2))


def filtered(x, response):
    m = next_fast_len(len(x) + SR // 2)
    return irfft(rfft(x, m) * response(np.fft.rfftfreq(m, 1 / SR)), m)[:len(x)]


def along(points, hz):
    f, v = np.transpose(points)
    return np.interp(np.log(hz + 1), np.log(f + 1), v)


def wobble(rate):
    knots = rng.standard_normal(int(N * rate / SR) + 4)
    return map_coordinates(knots, [np.arange(N) * rate / SR])


def unit(x):
    return x / np.sqrt(np.mean(x ** 2) + 1e-20)


def add_at(out, s, sound):
    start = round(s * SR)
    out[start:start + len(sound)] += sound


def scene():
    contacts = contact_flicks() + small_contacts() + stop_hits() + home_hits()
    dial = shaded(contacts + gears()) + landing_ring()
    return (dial + boost_factor(-6.0) * walls(dial) + knuckle_thumps() + room_tone())[None]


def roll_off(x):
    return signal.sosfilt(signal.butter(12, 16820, fs=SR, output="sos"), x)


def record(dry):
    limited = filtered(dry[0], lambda f: 1 / (1 + (f / 15850) ** 80))
    hz, t, z = signal.stft(limited, SR, nperseg=1024, noverlap=768)
    for s, edge_hz in THINNED:
        near = abs(t - s) < max(19 / edge_hz, .006)
        level = np.mean(abs(z[:, near]), axis=1)
        peaks = level >= -minimum_filter1d(-level, size=17)
        strong = uniform_filter1d(peaks * 1., size=3) > 0
        kept = (hz < edge_hz) | strong & (hz < 10500)
        leftover = boost_factor(LEFTOVER_DB) * (edge_hz > MILD_HZ)
        z[:, near] *= np.maximum(kept, leftover)[:, None]
    mix = signal.istft(z, SR, nperseg=1024, noverlap=768)[1][None, :N]
    return roll_off(mix)


dry = scene()
out = record(dry)
to_wav(out)
```